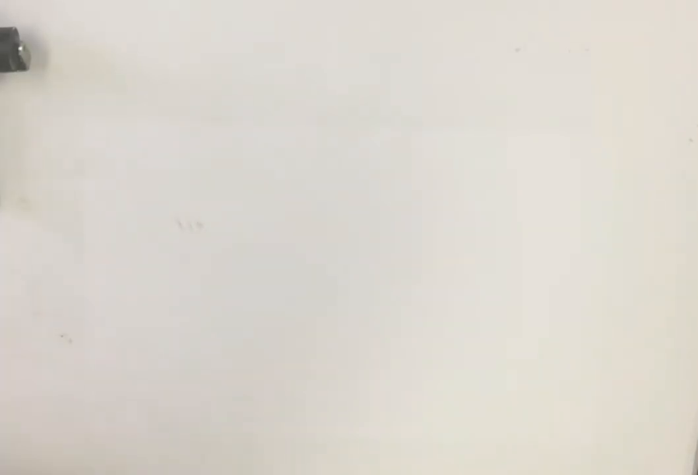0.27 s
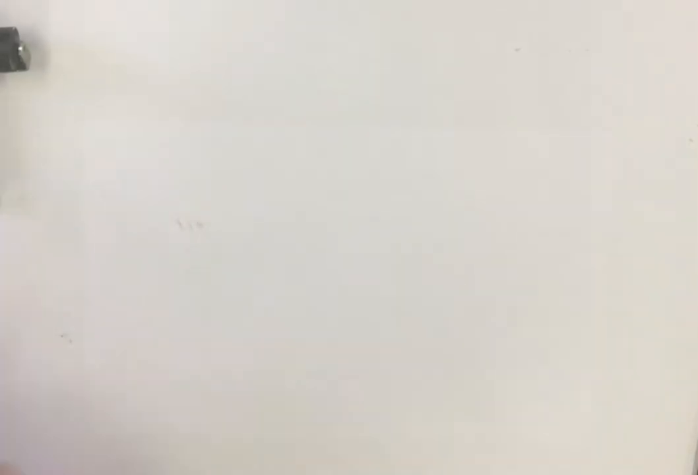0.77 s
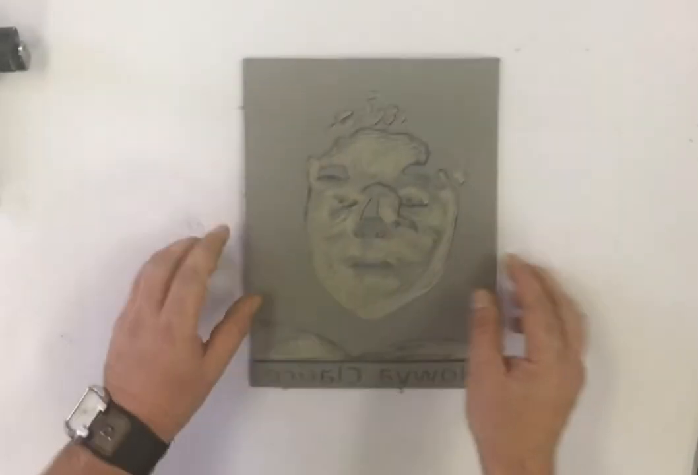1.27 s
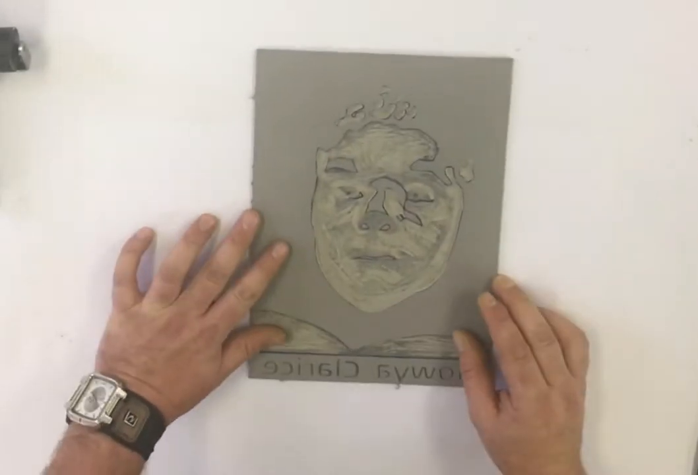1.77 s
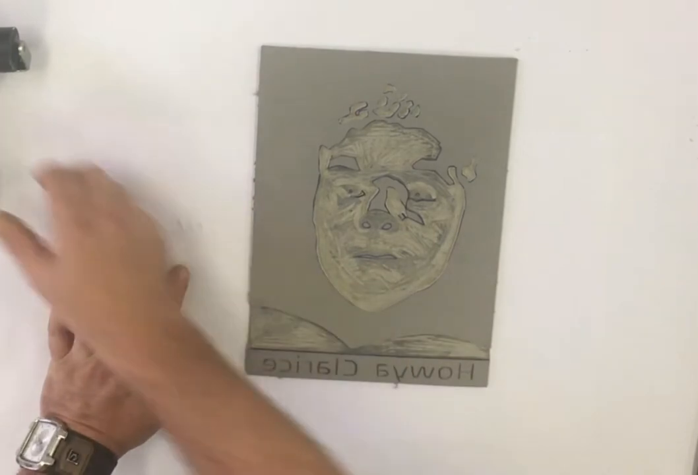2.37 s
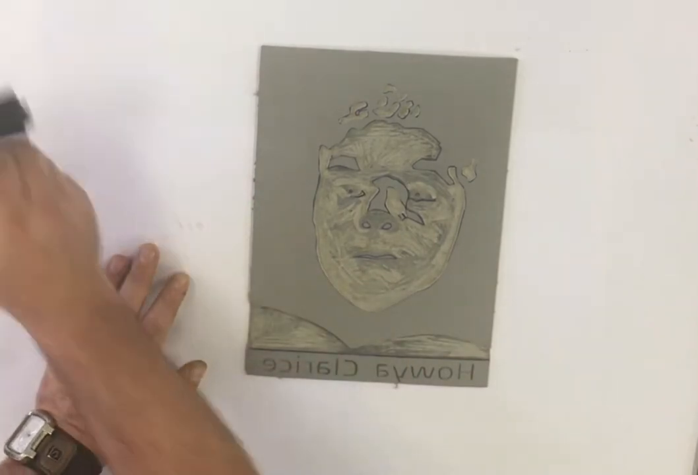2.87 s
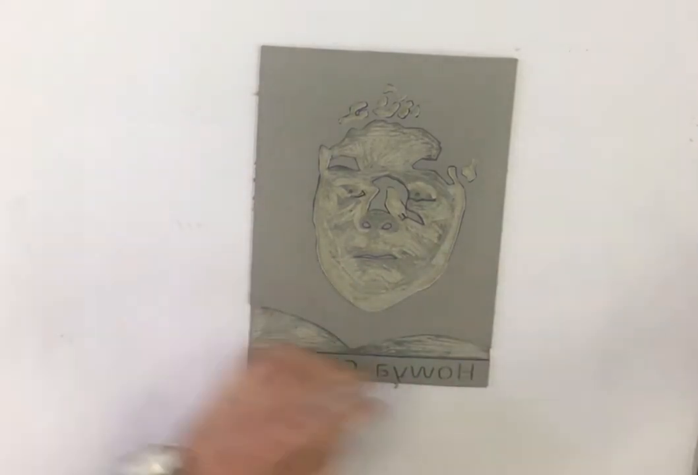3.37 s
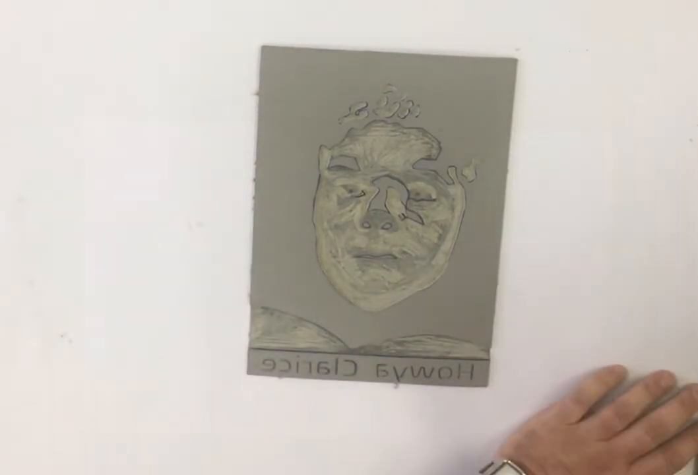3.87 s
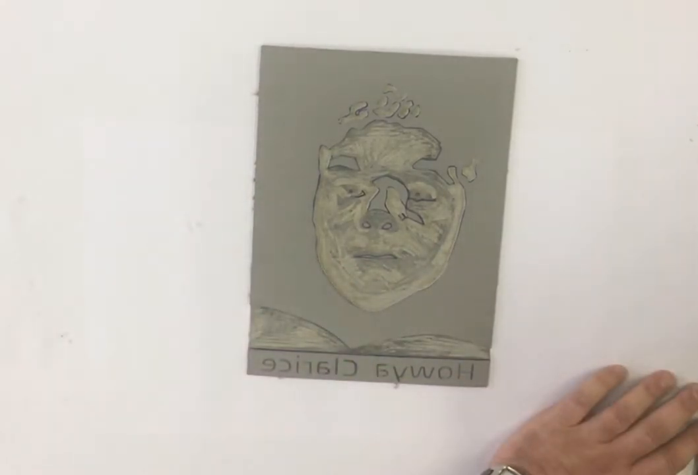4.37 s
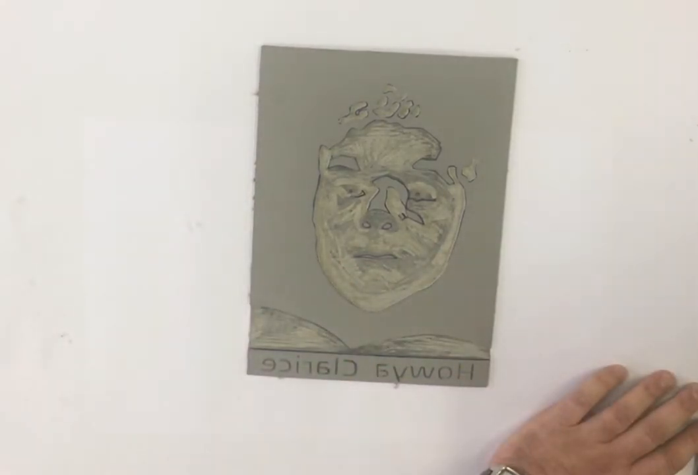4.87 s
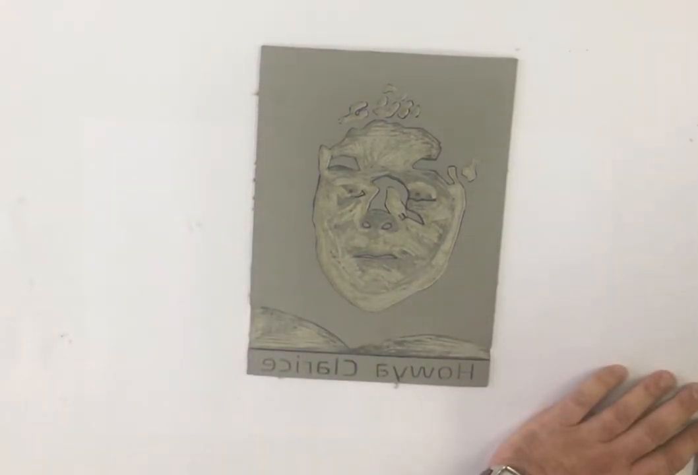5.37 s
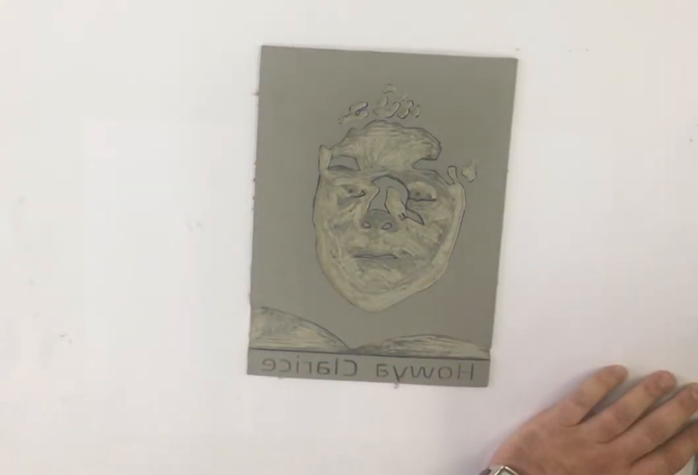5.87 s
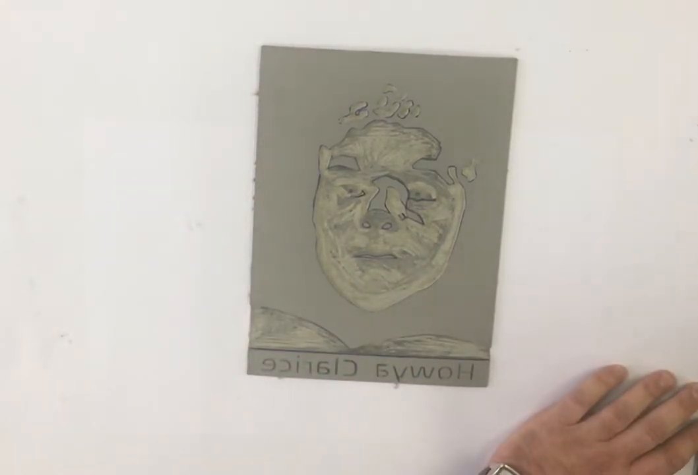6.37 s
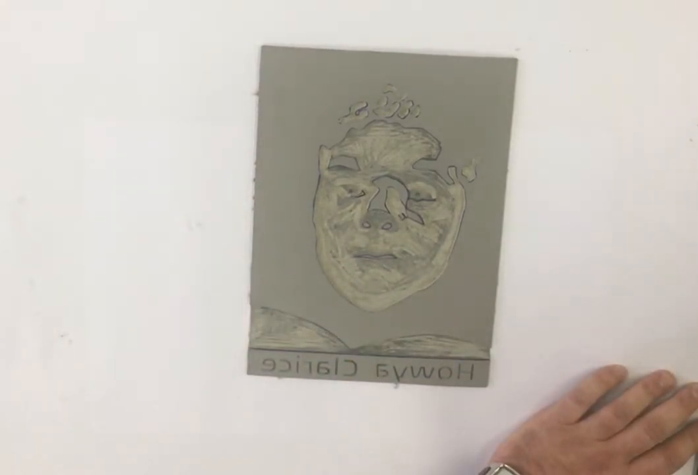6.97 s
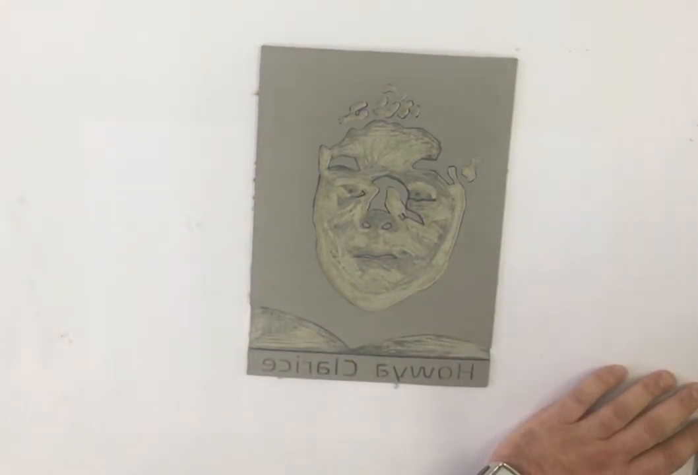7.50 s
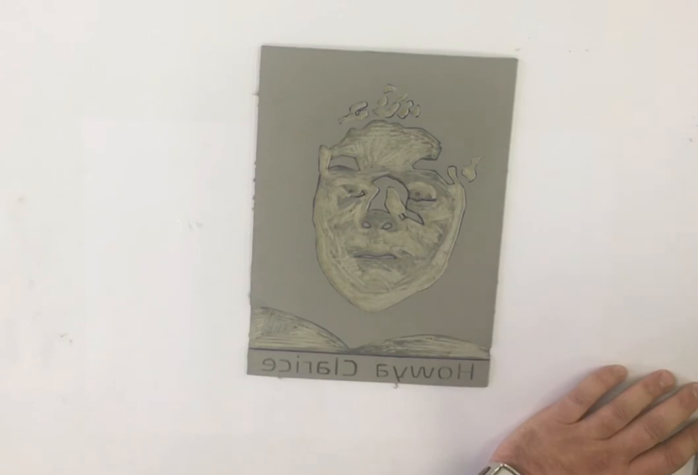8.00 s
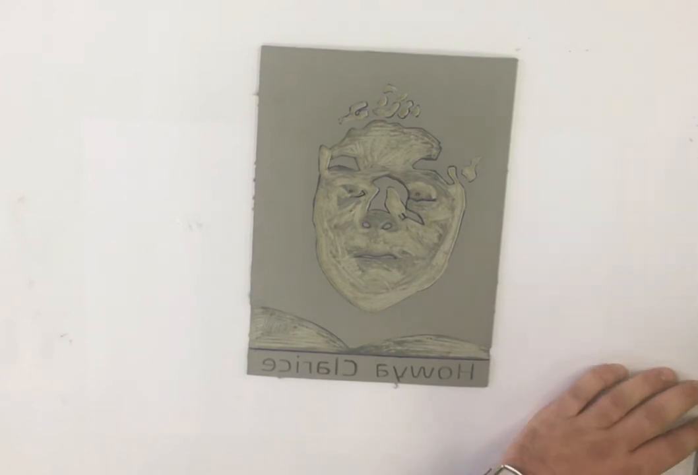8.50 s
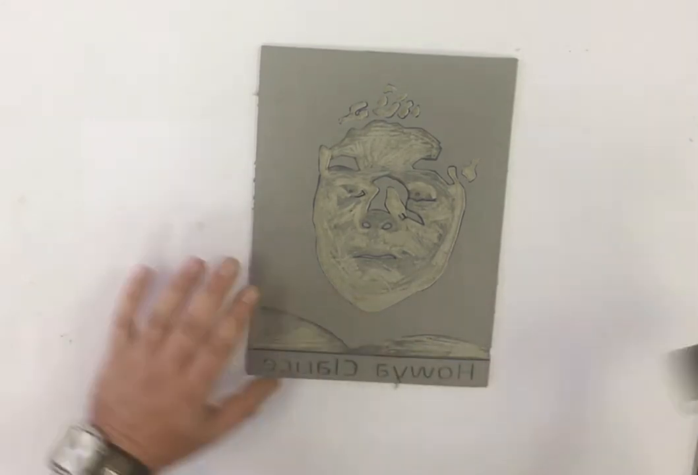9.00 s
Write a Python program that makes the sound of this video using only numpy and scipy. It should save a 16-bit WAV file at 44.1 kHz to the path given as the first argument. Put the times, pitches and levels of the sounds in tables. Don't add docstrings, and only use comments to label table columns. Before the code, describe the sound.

One sharp metallic clack with a bright room tail opens the scene, followed by quiet skin and plate rubbing, small ticks and a dull far-off booming thud. A rubber ink roller is picked up and knocked onto the slab, then rolled in rapid tacky strokes, about four a second, tearing ink with a crisp fizz and little snaps at the turns. A short gap, then a second softer spell of rolling. Mono overhead microphone in a live workshop with steady airflow.

```python
import sys
import numpy as np
from scipy import signal
from scipy.fft import rfft, irfft, next_fast_len
from scipy.io import wavfile
from scipy.ndimage import uniform_filter1d, map_coordinates

SR = 44100
rng = np.random.default_rng(int(sys.argv[2]) if len(sys.argv) > 2 else 0)


def to_wav(s):
    ch = np.atleast_2d(s).T
    pcm = np.round(np.clip(ch, -1, 1) * 32767)
    wavfile.write(sys.argv[1], SR, pcm.astype(np.int16))


def attenuation_scalar(level_db):
    decades = np.asarray(level_db, float) / 20
    return 10 ** decades


N = 407484

# (time [s], click level [dB], knock level [dB], low knock frequency [Hz], knock T60 [s])
LANDING = [(3.5345, -18.5, -37, 820, 0.01), (3.545, -38.5, -44, 483, .01), (3.5553, -40, -24, 340, 0.01),
           (3.556, -11.5, -26, 484, 0.01), (3.5563, -40, -21.5, 1010, 0.014), (3.5634, -40, -31, 1020, .01),
           (3.5645, -40, -29, 485, .01), (7.433, -23.5, -38, 190, 0.008), (7.4374, -39, -41, 288, .006),
           (7.4396, -50, -32.5, 1010, 0.004), (7.4445, -39, -48, 820, .006), (7.445, -54, -35, 990, .005)]
# (frequency [Hz], level [dB])
SKIN = [(2650, -24.5), (4500, 4), (4890, -1), (5510, 1.5), (11000, 0.5), (14100, -3.5), (15600, -11.5)]


def rolling():
    # (time of top speed [s], speeding up [s], slowing down [s], tearing level [dB])
    strokes = [(3.72, 0.13, 0.14, -36.5), (3.86, 0.077, 0.067, -40.5), (4.1, 0.17, 0.0517, -32.5),
               (4.31, 0.24, 0.04, -39.5), (4.52, 0.16, 0.16, -32), (4.71, 0.076, 0.16, -35),
               (4.98, 0.097, 0.083, -29.5), (5.17, 0.098, 0.14, -35), (5.438, 0.085, 0.063, -29),
               (5.643, 0.064, 0.11, -32.5), (5.871, 0.11, 0.087, -30.5), (6.05, 0.071, 0.11, -33),
               (6.16, 0.049, 0.07, -41.5), (6.381, 0.12, 0.085, -29.5), (6.64, 0.13, 0.12, -37),
               (6.81, 0.19, 0.058, -49), (7.05, 0.14, 0.081, -32), (7.61, 0.14, 0.17, -40.5),
               (7.84, 0.076, 0.22, -34.5), (8.16, 0.15, 0.15, -36.5), (8.391, 0.076, 0.27, -33),
               (8.66, 0.05, 0.13, -39.5)]
    stroke_lean = [-0.72, -.9, 0.88, -.5, .9, -0.916, 0.86, -.9, 0.84, -.8, .6, -1, -0.87, 0.67, -0.86,
                   0.41, 1, 1, .95, -.9, 0.69, -.4]
    # (time [s], ripping [s], fading [s], level [dB])
    turns = [(3.982, 0.036, 0.041, -38.5), (4.18, 0.022, 0.089, -40), (4.408, 0.028, 0.038, -36.5),
             (4.865, 0.0079, 0.17, -41.5), (5.312, 0.0048, 0.24, -42), (6.26, 0.0293, 0.04, -36.5),
             (6.935, 0.044, 0.036, -36.5), (7.49, 0.035, 0.038, -54), (7.76, 0.013, 0.19, -50),
             (8.03, 0.022, 0.12, -50), (8.312, 0.0227, 0.12, -43)]
    # (time [s], peak level [dB])
    thick_threads = [(3.6778, -25), (3.8858, -23), (3.951, -36), (3.9526, -34), (3.955, -36), (3.9569, -24),
                     (3.9596, -24), (3.9636, -27), (3.968, -29), (3.9708, -26), (3.9774, -21),
                     (4.1681, -32), (4.3813, -26), (4.3843, -34), (4.386, -27), (4.3879, -31),
                     (4.3894, -26), (4.394, -24), (4.3993, -25), (4.4009, -24), (4.8596, -32),
                     (4.8706, -29), (5.3036, -36), (5.3071, -35), (5.3108, -23), (5.7725, -35),
                     (6.224, -34), (6.2271, -39), (6.231, -30), (6.2354, -32), (6.242, -27), (6.2452, -25),
                     (6.2496, -31), (6.8885, -41), (6.8938, -35), (6.8952, -33), (6.8994, -30),
                     (6.905, -30), (6.91, -32), (7.0153, -18), (7.0702, -15), (7.4843, -35), (7.7509, -29),
                     (7.7601, -34), (7.7639, -29), (7.7892, -26), (7.7932, -25), (7.823, -21),
                     (7.8294, -19), (7.8555, -18), (8.0086, -39), (8.2958, -36), (8.3003, -30),
                     (8.3079, -30), (8.3368, -26), (8.4613, -22), (8.6404, -29)]
    # (time [s], level [dB])
    squeezed = [
        (3.558, -30.5),
        (3.563, -23.5),
        (3.567, -23.5),
        (3.573, -28.5),
        (3.579, -40),
        (3.59, -53),
        (3.61, -65.5),
    ]
    # (frequency [Hz], level [dB])
    fine_colour = [(2820, -54), (4800, -29), (5540, -6), (6520, 0.5), (7340, -3), (9530, 3), (10300, 2.5),
                   (11200, 4), (13900, -0.5), (15600, -3)]
    coarse_colour = [(900, -41), (1400, -8.5), (2100, -9.5), (2450, -7.5), (3100, -6.5), (3700, -2.5),
                     (4200, -7.5), (4700, -3.5), (5300, -1.5), (6800, -30)]
    snap_colour = [(1500, -40), (3000, -12), (6000, -5), (11000, 5), (15600, -2)]
    wet_colour = [(1470, -41), (2500, -10), (2940, -16), (4270, -11.5), (5780, -11), (6240, 2), (7300, -10),
                  (8200, -2), (9200, -6.5), (11400, -9.5), (16000, -30)]
    # (frequency [Hz], width [Hz], level [dB])
    slab_modes = [(195, 18, -1), (335, 57, -6), (510, 101.5, -5), (823, 32.6, 1.5), (957.8, 76, -3),
                  (1128, 270, -4.5), (1264, 280, -7)]
    gap_modes = [(2530, 180, -3), (4134, 730, 4)]

    stroke_round, turn_round = 1.61, 4.02
    ref_db = -35
    gain = moving()
    stroke = gain * attenuation_scalar(swells(strokes, stroke_round))
    turn = gain * attenuation_scalar(swells(turns, turn_round))
    tear_db = 20 * np.log10(stroke + turn)
    load_db = 20 * np.log10(stroke + attenuation_scalar(-4.5) * turn) - ref_db

    spread_db = np.clip(4.5 + 0.1 * (tear_db - ref_db), 0, 2.7)
    threads = crackle(spread_db, clump_db=0.8, clump_rate=280)
    threads = patchy(threads, fine_db=-0.35, broad_db=1.5)
    fine = attenuation_scalar(tear_db) * unit(coloured(threads, fine_colour))
    coarse_db = -48.5 + 0.75 * load_db + 0.74 * wobble(35)
    coarse = attenuation_scalar(coarse_db) * unit(coloured(patchy(threads, fine_db=0.0, broad_db=0.5), coarse_colour))

    lean = np.interp(np.arange(N) / SR, np.transpose(strokes)[0], stroke_lean)
    gap_db = -56 + 2 * lean + 1.3 * load_db
    coarse += attenuation_scalar(gap_db) * unit(resonant(resonant(threads, gap_modes), gap_modes))

    jolt_db, jolt_s = -14, 0.039
    jolt = attenuation_scalar(swells([(s, .003, jolt_s, db + jolt_db) for s, _, db, *_ in LANDING], 0.63))
    slab_db = -52 + 0.71 * load_db - 2 * lean + 1.34 * wobble(14)
    tugs = crackle(spread_db=1.5, clump_db=1.5, clump_rate=39)
    slab = (attenuation_scalar(slab_db) + jolt) * unit(resonant(tugs, slab_modes))

    bubbles = crackle(spread_db=2.0, clump_db=2.0, clump_rate=760)
    splat = attenuation_scalar(curve(squeezed)) * unit(coloured(bubbles, wet_colour))

    snaps = np.zeros(N)
    for s, db in thick_threads:
        add(snaps, s, burst(0.002, sharp=3.8), db + 6.5)
    direct = fine + coarse + slab + splat + coloured(snaps, snap_colour)
    return direct + attenuation_scalar(-12.5) * room(direct)


def moving():
    # (time [s], hush, negative for a surge [dB], restarting [s])
    halts = [(3.95, 9.5, 0.008), (4.155, 9, .01), (4.38, 6, 0.011), (4.625, 13.5, 0.016), (4.854, 1, .003),
             (5.305, -4, .003), (5.76, 2, 0.016), (6.226, 2.5, .003), (6.892, 5.5, .004), (6.975, 7, 0.012),
             (7.744, 4, .004), (7.995, 13.5, 0.024), (8.28, 5, .012), (8.55, 15, 0.015)]
    # (start [s], end [s])
    contact = [
        (3.575, 7.2),
        (7.445, 8.9),
    ]
    braking_s = 0.021
    t = np.arange(N) / SR
    hush_db = np.zeros(N)
    for s, db, restart_s in halts:
        hush_db += db * np.exp(-np.abs(t - s) / np.where(t < s, braking_s, restart_s))
    down = sum((t > start) & (t < end) for start, end in contact)
    return attenuation_scalar(-hush_db) * uniform_filter1d(down * 1., size=600) + 1e-4


def landings():
    # (frequency [Hz], level [dB])
    frame_colour = [(500, -41.5), (1400, -8.5), (1950, 3.5), (2250, -1.5), (2650, 4), (3300, -5), (3900, 4),
                    (4700, -7), (5300, -4), (6300, -14), (10000, -20), (16000, -31)]
    # (frequency [Hz], width [Hz], level [dB])
    knock_modes = [(807, 55, -15), (1160, 74, -9), (1581, 670, -25)]
    out, blows = np.zeros(N), np.zeros(N)
    for s, db, knock_db, hz, knock_t60 in LANDING:
        body = sorted(knock_modes + [(hz, 28 + 0.053 * hz, 3)])
        add(out, s, coloured(burst(.006, sharp=15), frame_colour), db)
        add(out, s, resonant(burst(knock_t60, sharp=13), body), knock_db)
        add(blows, s, coloured(burst(0.00037, sharp=6), frame_colour), db)
        add(blows, s, resonant(burst(0.00027, sharp=24), body), knock_db - 0.3)
    return out + attenuation_scalar(-3.5) * room(blows, gap=0.0049, early_db=13.5)


def tool():
    # (time [s], peak level [dB], ring frequency [Hz], T60 [s])
    contacts = [
        (0.1414, -7, 3364, 0.027),
        (0.1422, -10, 5700, 0.009),
        (0.1509, 2, 3100, 0.016),
        (0.1543, -13, 3480, .012),
        (0.1627, -15.5, 3100, .015),
        (0.1651, -15.5, 2900, .015),
    ]
    # (frequency [Hz], level [dB])
    contact_colour = [(120, -54.5), (230, -27.5), (325, -10.5), (480, -20), (900, -13.5), (1250, -3.5),
                      (2200, -5), (3500, -4.5), (3850, -8.5), (4500, -12), (5100, -22), (5800, -13),
                      (6500, -21.5), (7100, -9.5), (7800, -15), (8600, -13), (10200, -19.5), (16000, -35)]
    # (frequency [Hz], width [Hz], level [dB])
    steel_modes = [(335, 28, -5), (1170, 30, 0), (1390, 30, 0.5), (1570, 30, 6), (1870, 30, -2),
                   (2090, 25, 4), (2178, 30, 0.5), (2815, 50, -0.5), (3120, 45, -7), (3170, 40, 1),
                   (3270, 30, -4.5), (3490, 44, -2), (4005, 30, -5), (7200, 200, -7.5)]
    out, blows = np.zeros(N), np.zeros(N)
    for s, db, hz, t60 in contacts:
        clack = coloured(burst(t60, sharp=6), contact_colour)
        ring = resonant(burst(t60, sharp=8), [(hz, 330, 0)])
        add(out, s, clack + 2.2 * ring, db + 3.0)
        add(blows, s, coloured(burst(0.00034, sharp=6.7), contact_colour), db - 3.0)
        add(blows, s, resonant(burst(0.00027, sharp=9), steel_modes), db - 22.5)
    return out + attenuation_scalar(6) * room(blows, gap=0.0024, early_db=9)


def sliding():
    # (time [s], swelling [s], fading [s], skin hiss level [dB], scrape level [dB])
    slides = [(0.0243, .004, 0.1, -60.5, -54), (.055, 0.036, .1, -60, -56),
              (.112, 0.0072, 0.117, -71, -44.5), (.71, 0.021, 0.058, -65.5, -65),
              (.95, 0.116, 0.25, -75.5, -58.5), (1.11, 0.0053, 0.18, -61.5, -70),
              (1.22, 0.0096, 0.059, -52.5, -49), (1.267, 0.02, 0.037, -54.5, -59),
              (1.505, 0.15, 0.17, -60, -51.5), (1.58, 0.06, 0.052, -61.5, -64),
              (1.69, 0.047, .045, -68, -62), (1.74, 0.0308, 0.17, -64, -52.5), (1.79, 0.1, 0.065, -60, -75),
              (1.88, .005, 0.037, -60, -73), (1.95, .03, 0.04, -69, -73.5),
              (2.092, 0.0054, 0.097, -60.5, -66), (2.3, 0.215, 0.21, -77, -63.5),
              (2.45, 0.12, 0.064, -63, -64), (2.5, 0.029, 0.31, -69, -82.5),
              (2.94, 0.019, 0.095, -64, -53.5), (3.05, 0.057, 0.17, -60.5, -77.5),
              (3.229, 0.025, 0.035, -56.5, -75.5), (8.9, 0.29, 0.236, -77, -62.5),
              (9.19, 0.013, 0.028, -67, -63), (9.225, 0.04, .06, -60, -57)]
    # (time [s], swelling [s], fading [s], level [dB])
    drags = [
        (1.49, .03, 0.045, -50),
        (1.52, .03, .06, -53),
        (1.57, .04, .07, -60),
    ]
    # (frequency [Hz], level [dB])
    scrape_colour = [(350, -32.5), (600, -9), (741, -7.5), (1030, -9.5), (1150, -12.5), (1860, -9),
                     (2070, -12.5), (2470, -15.5), (4500, -19), (5850, -52.5), (9900, -120)]
    # (frequency [Hz], width [Hz], level [dB])
    plate_modes = [(1480, 55, -0.5), (1880, 79, 0.5), (2250, 60, -7.5), (2420, 60, -3.5), (2780, 60, -7),
                   (3110, 80, -8.5)]
    roundness = 1.2
    skin_db = swells([(s, rise, fall, db) for s, rise, fall, db, _ in slides], roundness)
    scrape_db = swells([(s, rise, fall, db) for s, rise, fall, _, db in slides], roundness)
    skin_grains = crackle(spread_db=3.0, clump_db=2.0, clump_rate=120)
    skin = attenuation_scalar(skin_db) * unit(coloured(skin_grains, SKIN))
    scrape_grains = crackle(spread_db=0.0, clump_db=0.5, clump_rate=54)
    scrape = attenuation_scalar(scrape_db) * unit(coloured(scrape_grains, scrape_colour))
    catches = crackle(spread_db=3.5, clump_db=-1.5, clump_rate=90)
    scrape += attenuation_scalar(swells(drags, roundness)) * unit(resonant(catches, plate_modes))
    return skin + scrape + attenuation_scalar(-12.5) * room(skin + scrape)


def ticks():
    # (time [s], peak level [dB], pitch [Hz], edge peak level [dB], edge frequency [Hz])
    touches = [(0.1087, -29.5, 1143, -39, 5000), (1.1085, -57.5, 1046, -41, 5940),
               (1.114, -62, 1500, -45, 5940), (1.133, -62.5, 1036, -42, 6000),
               (1.216, -46, 1955, -32, 9000), (1.223, -55, 1500, -41, 11000),
               (1.231, -38, 1180, -45, 10500), (1.266, -37, 1162, -50, 9000), (1.423, -66, 2400, -51, 6500),
               (1.479, -56, 2880, -43, 5500), (1.493, -64, 2000, -50, 8200), (1.505, -66, 2000, -53, 7000),
               (1.7294, -37.5, 1910, -54, 6000), (1.878, -60, 1300, -47, 8000),
               (2.088, -52, 2295, -41, 5600), (2.113, -48, 1640, -42, 6000), (2.128, -47, 2500, -50, 5000),
               (2.417, -56, 2286, -46, 6500), (2.4533, -66.5, 2010, -42, 9800),
               (2.4808, -63, 1996, -36.5, 12000), (2.551, -66, 2500, -53.5, 5200),
               (2.9293, -36, 2120, -44.5, 8000), (2.943, -45, 1300, -57, 7000),
               (2.969, -42, 2040, -54, 5500), (3.044, -62, 2000, -47, 6500), (3.050, -48, 2010, -60, 6500),
               (3.211, -64, 2000, -52.5, 6000), (3.221, -63, 2000, -42, 11500),
               (3.226, -65, 1930, -46, 13000), (3.234, -64, 2000, -38, 11500),
               (3.284, -47, 1220, -67, 6000), (6.128, -45, 519, -70, 6040), (6.598, -38.5, 1250, -70, 6000),
               (7.0931, -34.5, 2290, -50, 6000), (8.713, -38, 1960, -60, 6000),
               (8.955, -49.5, 3400, -70, 6000), (9.118, -38.5, 3994, -44, 6000),
               (9.127, -51, 1400, -46, 4600), (9.155, -59, 2000, -45, 4800), (9.1805, -60, 2000, -45, 5500),
               (9.185, -60, 2400, -43, 5600), (9.191, -62, 2400, -50, 4800)]
    # (time [s], peak level [dB])
    nudges = [
        (2.9296, -35),
        (2.9425, -41),
        (2.969, -34),
        (2.979, -46),
        (3.015, -52),
        (3.051, -44.5),
        (3.2854, -45),
    ]
    # (frequency [Hz], width [Hz], level [dB])
    handle_modes = [(1500, 150, -2.5), (2010, 95, 7), (2605, 190, 0), (4100, 134, -4)]
    out = np.zeros(N)
    for s, db, hz, edge_db, edge_hz in touches:
        modes = [(0.48 * hz, 0.12 * hz, -3), (0.64 * hz, 0.027 * hz, 3),
                 (hz, 0.14 * hz, 0), (2.02 * hz, 0.1204 * hz, -1)]
        body = resonant(burst(0.027, sharp=13.5), modes)
        add(out, s, coloured(body, [(1.7 * hz, 0), (4.4 * hz, -24)]), db)
        edge = coloured(burst(.004, sharp=4), SKIN)
        add(out, s, .3 * edge + resonant(edge, [(edge_hz, 0.2 * edge_hz, 0)]), edge_db)
    for s, db in nudges:
        add(out, s, resonant(burst(0.0038, sharp=9), handle_modes), db)
    return out + attenuation_scalar(-10.0) * room(out)


def thud():
    # (time [s], boom level [dB], rattle level [dB])
    bounces = [
        (1.759, -31.5, -39),
        (1.803, -36, -47),
        (1.86, -32, -50.5),
        (1.917, -34.5, -48),
        (1.985, -37, -50),
        (2.055, -39, -53),
        (2.125, -50.5, -73),
        (2.175, -52, -69),
        (2.235, -51.5, -71),
    ]
    # (frequency [Hz], width [Hz], level [dB])
    panel_modes = [(190, 55, 0.5), (276, 21.5, 5), (344, 34, 0), (434, 43, -3.5), (555, 44, -3.5),
                   (884, 230, -19.5)]
    boom_rise_s, boom_fall_s, rattle_rise_s, rattle_fall_s = 0.017, 0.049, 0.051, 0.067
    boom_db = swells([(s, boom_rise_s, boom_fall_s, db) for s, db, _ in bounces], 1.1)
    rattle_db = swells([(s, rattle_rise_s, rattle_fall_s, db) for s, _, db in bounces], 1.64)
    boom_hz = 129.9 * (1 + 0.022 * wobble(22))
    boom = np.sqrt(2) * np.sin(2 * np.pi * np.cumsum(boom_hz) / SR)
    rattle = unit(resonant(crackle(spread_db=-0.5, clump_db=1.0, clump_rate=29), panel_modes))
    return attenuation_scalar(boom_db) * boom + attenuation_scalar(rattle_db) * rattle


def far():
    # (time [s], level [dB], pitch [Hz], T60 [s])
    knocks = [(1.52, -44.5, 345, 0.33), (3.349, -42, 190, 0.055), (3.363, -42, 190, 0.066),
              (3.428, -41.5, 176, 0.12), (4.628, -42.5, 500, 0.2), (5.971, -42, 508, 0.27),
              (4.515, -47, 330, 0.092), (5.126, -48, 347, 0.094), (4.628, -48, 990, .06),
              (5.972, -46, 1020, .06), (6.92, -44, 327, 0.19), (7.8, -48, 105, 0.25),
              (7.864, -43.5, 204, 0.24), (9.116, -47, 1419, 0.17), (9.2, -50, 1140, 0.13)]
    # (frequency [Hz], width [Hz], level [dB])
    whine_modes = [(464.4, 15, 1.5), (563, 26, -3), (734.5, 36, -4.5), (1000, 46, -11.5), (1500, 62, -14.5)]
    # (time [s], level [dB])
    running = [
        (8.1, -61),
        (8.3, -60.5),
        (8.8, -56.5),
        (9.24, -60),
    ]
    blows = np.zeros(N)
    for s, db, hz, t60 in knocks:
        struck = resonant(burst(t60), [(hz, 40 + 0.057 * hz, 0)])
        add(blows, s, resonant(struck, [(hz, 90 + 0.081 * hz, 0)]), db)
    whine_db = curve(running) + 0.78 * wobble(7.9)
    whine = attenuation_scalar(whine_db) * unit(resonant(rng.standard_normal(N), whine_modes))
    return blows + attenuation_scalar(-7) * room(blows) + whine


def air():
    # (time [s], level [dB])
    draught = [(0, -54), (.7, -55), (1.2, -54.5), (2.0, -56), (2.9, -59), (4, -57), (5.3, -58.5),
               (6.4, -54.5), (7.6, -55.5), (8.2, -58), (9.24, -55)]
    # (frequency [Hz], level [dB])
    rumble_colour = [(15, -27.5), (25, 3), (86, -3), (103, -0.5), (119, -5.5), (140, -17), (180, -33.5),
                     (310, -120)]
    hum_colour = [(76, -29.5), (130, -4.5), (162, -7.5), (243, -4), (274, -6.5), (402, -10.5), (589, -16.5),
                  (917, -16.5), (1120, -17.5), (1550, -22), (1680, -22.5), (4590, -31.5), (16000, -41)]
    draught_db = np.interp(np.arange(N) / SR, *np.transpose(draught))
    rumble_db = draught_db + 0.52 * wobble(6.7)
    rumble = attenuation_scalar(rumble_db) * unit(coloured(rng.standard_normal(N), rumble_colour))
    hum_db = -57.5 + 0.49 * (draught_db - draught_db.mean()) + 0.37 * wobble(11.0)
    return rumble + attenuation_scalar(hum_db) * unit(coloured(rng.standard_normal(N), hum_colour))


def room(x, gap=.009, early_db=0):
    # (frequency [Hz], T60 [s])
    decay = [(200, 1), (530, 1), (1400, 0.87), (3500, 0.91), (4700, 0.84), (7200, 0.72), (11000, 0.5),
             (15000, 0.43)]
    hz, t, z = signal.stft(rng.standard_normal(SR), SR, nperseg=256)
    fall = attenuation_scalar(-60 * t / along(decay, hz)[:, None])
    early = attenuation_scalar(early_db * np.exp(-t / 0.05))
    tail = signal.istft(z * fall * early, SR, nperseg=256)[1]
    delayed = np.pad(x, (round(gap * SR), 0))
    return signal.oaconvolve(delayed, tail / np.linalg.norm(tail))[:N]


def crackle(spread_db, clump_db, clump_rate):
    size_db = spread_db * np.minimum(rng.exponential(1, N), 5.8)
    size = attenuation_scalar(size_db + clump_db * wobble(clump_rate))
    even = np.sqrt(np.clip(1 - spread_db * np.log(10) / 10, .25, 1))
    return even * size * rng.standard_normal(N)


def patchy(x, fine_db, broad_db):
    z = signal.stft(x, nperseg=128)[2]

    def patches(bins, hops):
        across = uniform_filter1d(rng.standard_normal(z.shape), bins, 0)
        return unit(uniform_filter1d(across, hops, 1))

    gain = attenuation_scalar(fine_db * patches(5, 3) + broad_db * patches(6, 25))
    return signal.istft(z * gain, nperseg=128)[1][:N]


def burst(t60, sharp=4.9):
    t = np.arange(SR // 5) / SR
    return attenuation_scalar(-60 * t / t60) * rng.standard_normal(len(t)) + sharp * (t == 0)


def resonant(x, modes):
    m = next_fast_len(len(x) + SR // 2)
    f = np.fft.rfftfreq(m, 1 / SR)
    gain = 0
    for k, (centre, width, db) in enumerate(modes):
        damping = 1j * f * width
        gain = gain + (-1) ** k * attenuation_scalar(db) * damping / (centre * centre - f * f + damping)
    return irfft(rfft(x, m) * gain, m)[:len(x)]


def coloured(x, spectrum):
    size = 4096
    gain = attenuation_scalar(along(spectrum, np.fft.rfftfreq(size, 1 / SR)))
    cepstrum = irfft(np.log(gain + 1e-5))
    cepstrum[1:size // 2] *= 2
    cepstrum[size // 2 + 1:] = 0
    return signal.oaconvolve(x, irfft(np.exp(rfft(cepstrum))))[:len(x)]


def swells(rows, roundness):
    t, total = np.arange(N) / SR, np.full(N, 1e-6)
    for s, rise, fall, db in rows:
        near = slice(max(round((s - 4 * rise) * SR), 0), round((s + 4 * fall) * SR))
        away = np.where(t[near] < s, (s - t[near]) / rise, (t[near] - s) / fall)
        total[near] += attenuation_scalar(db - 20 * away ** roundness)
    return 20 * np.log10(total)


def curve(points):
    s, db = np.transpose(points)
    s = np.concatenate([[s[0] - .004], s, [s[-1] + .03]])
    return np.interp(np.arange(N) / SR, s, np.concatenate([[-110], db, [-110]]))


def wobble(rate):
    knots = rng.standard_normal(int(N * rate / SR) + 4)
    return map_coordinates(knots, [np.arange(N) * rate / SR])


def along(points, hz):
    f, v = np.transpose(points)
    return np.interp(np.log(hz + 1), np.log(f + 1), v)


def unit(x):
    return x / np.sqrt(np.mean(x ** 2) + 1e-20)


def add(track, s, sound, db):
    part = track[round(s * SR):][:len(sound)]
    part += attenuation_scalar(db) * sound[:len(part)] / np.abs(sound).max()


def scene():
    mono = rolling() + landings() + tool() + ticks() + thud() + far() + sliding() + air()
    return np.array([mono, mono])


def roll_off(x):
    return signal.sosfilt(signal.butter(12, 16000, fs=SR, output="sos"), x)


def record(dry):
    response = [(15, -57.0), (30, -23), (45, 1.5), (4600, -2.5), (5100, -4.0), (5600, -1),
                (9900, -0.5), (10400, -4.5), (10900, -0.5)]
    mic = coloured(dry[0], response)
    mic = signal.sosfilt(signal.ellip(10, .5, 70, 15750, fs=SR, output="sos"), mic)
    mic = mic / (1 + np.abs(mic / .92) ** 8) ** (1 / 8)
    return roll_off(np.array([mic, mic]))


dry = scene()
out = record(dry)
to_wav(out)
```